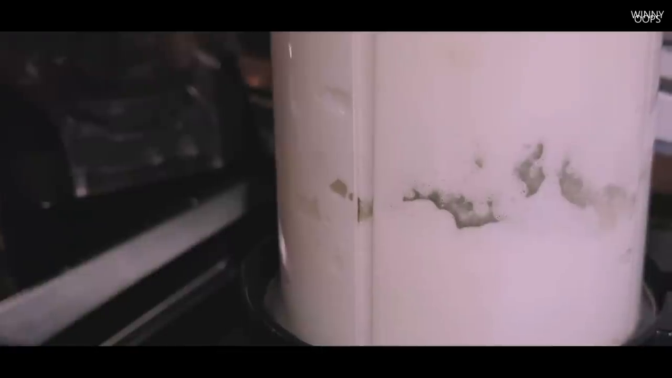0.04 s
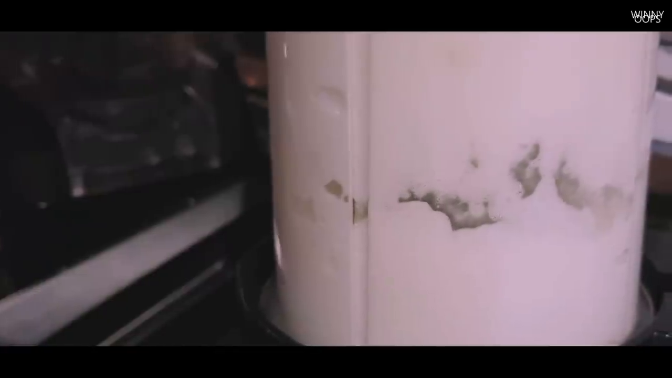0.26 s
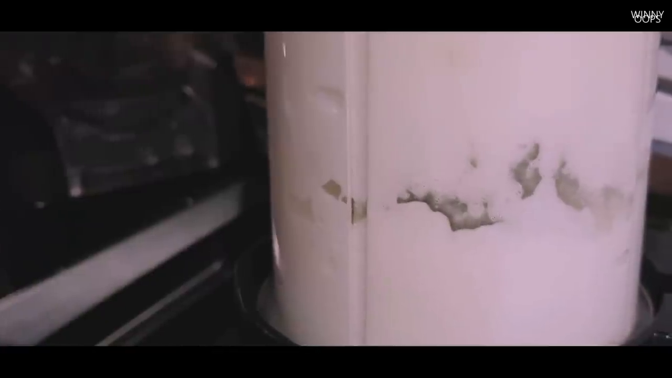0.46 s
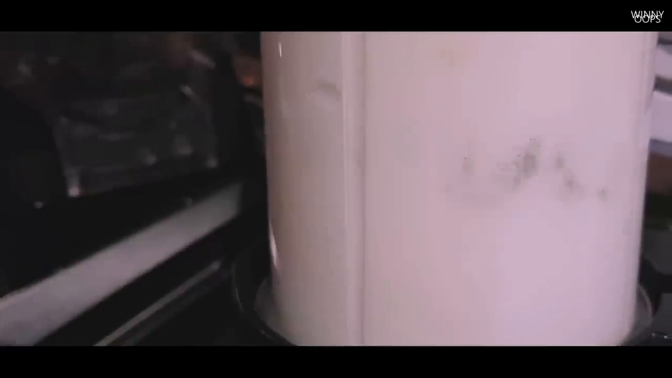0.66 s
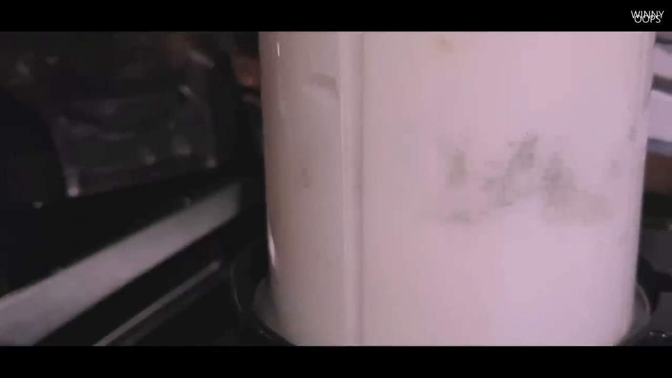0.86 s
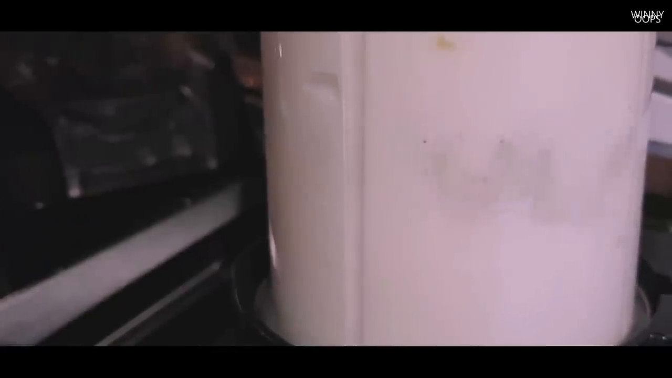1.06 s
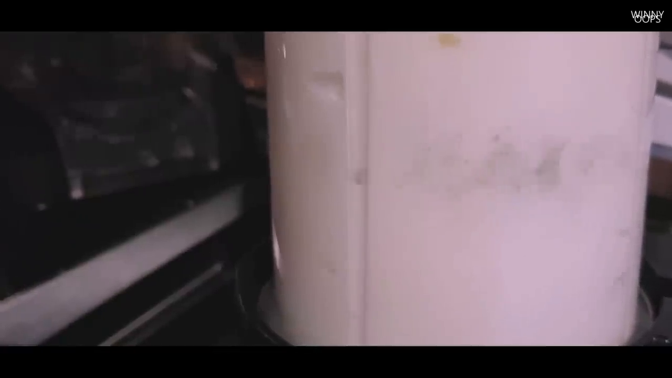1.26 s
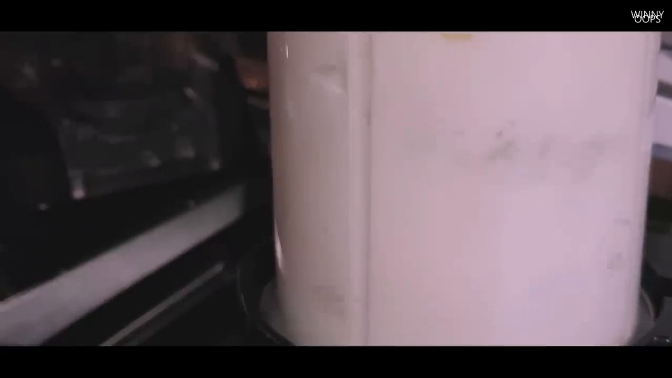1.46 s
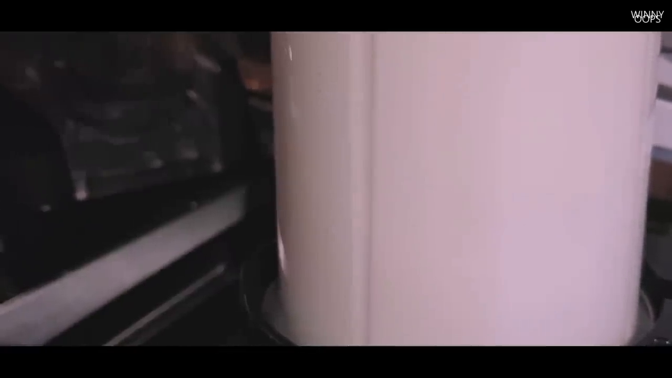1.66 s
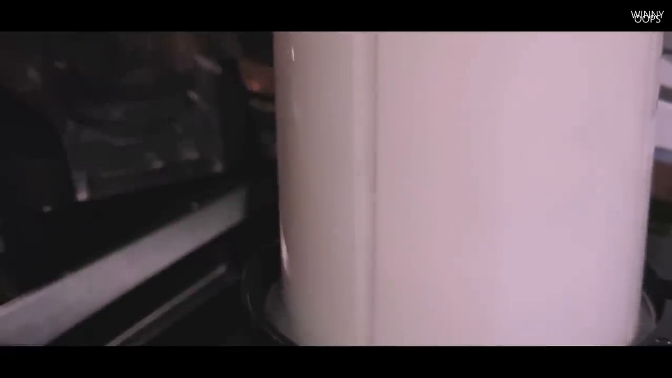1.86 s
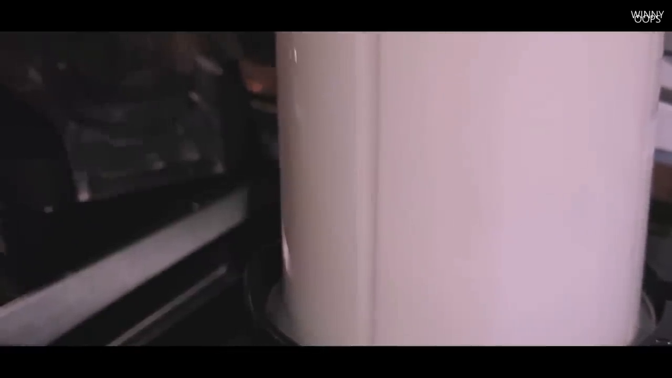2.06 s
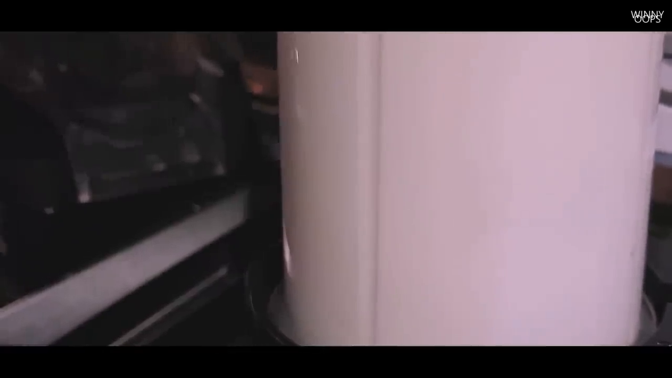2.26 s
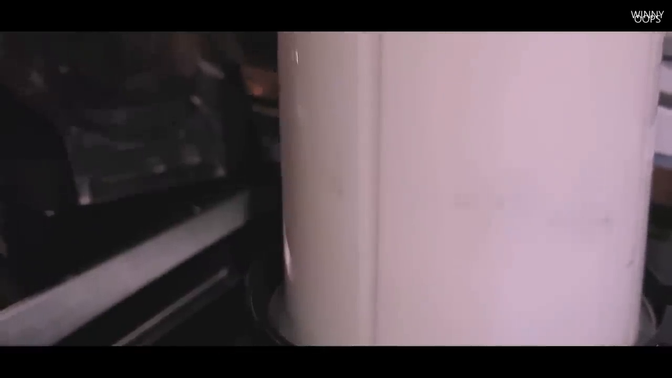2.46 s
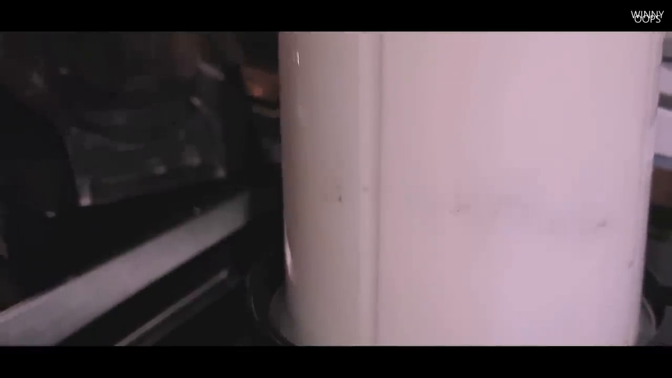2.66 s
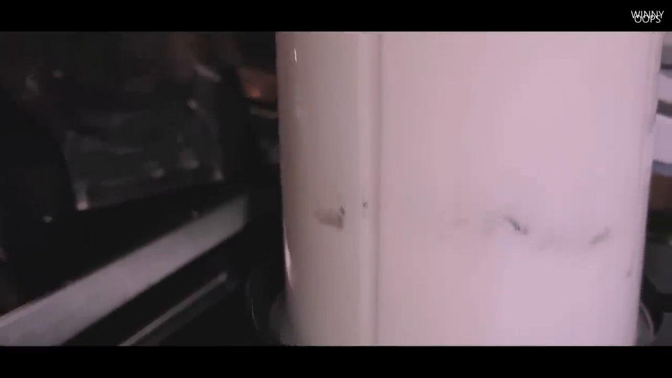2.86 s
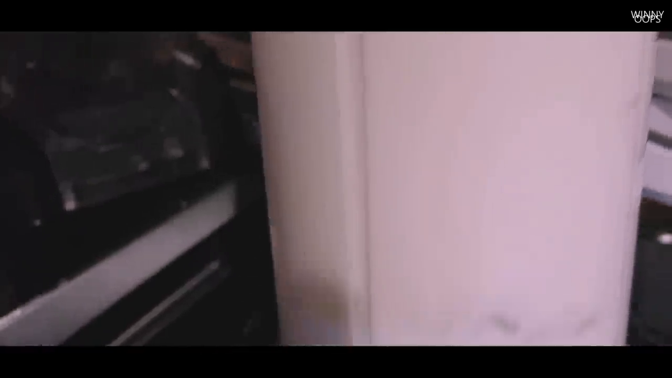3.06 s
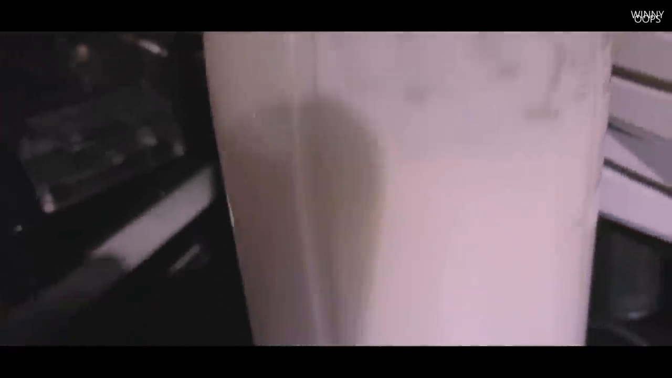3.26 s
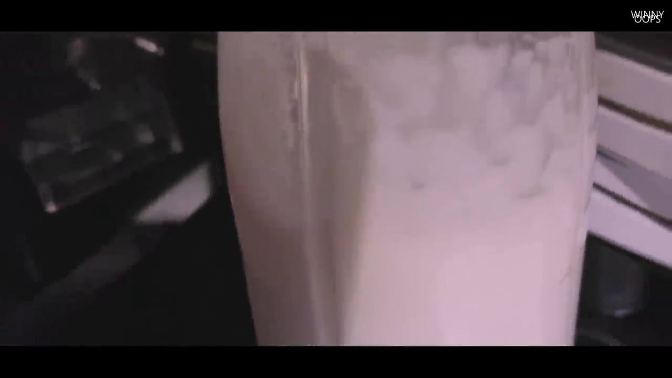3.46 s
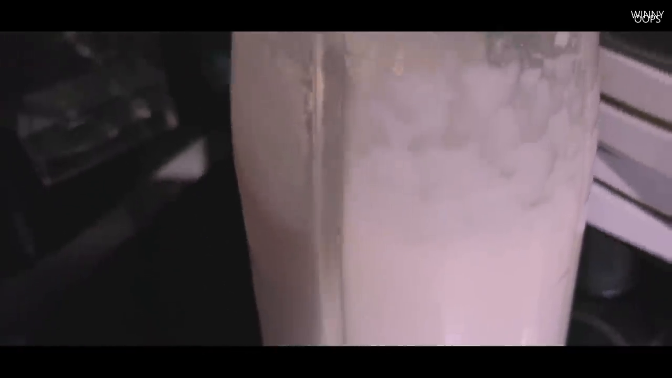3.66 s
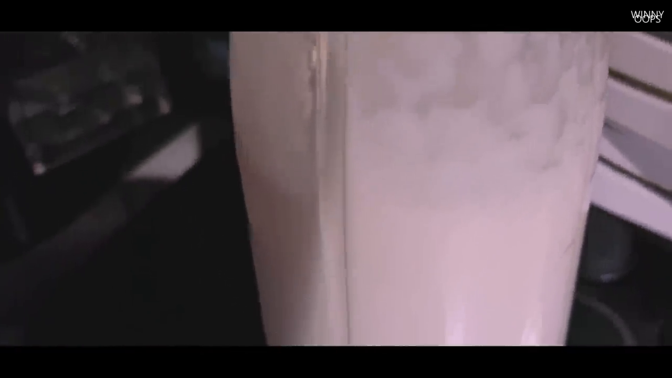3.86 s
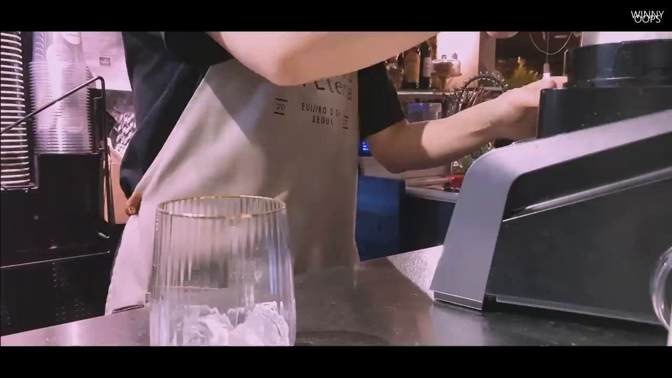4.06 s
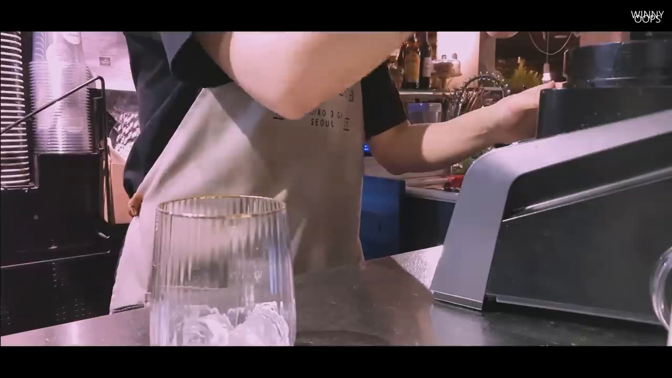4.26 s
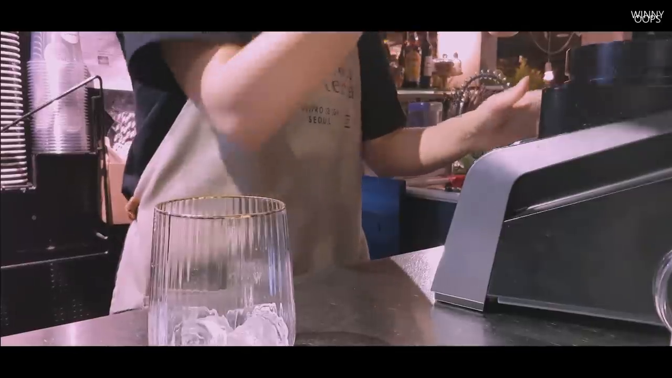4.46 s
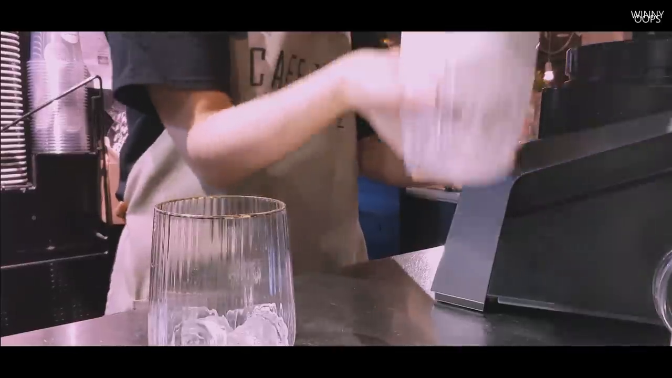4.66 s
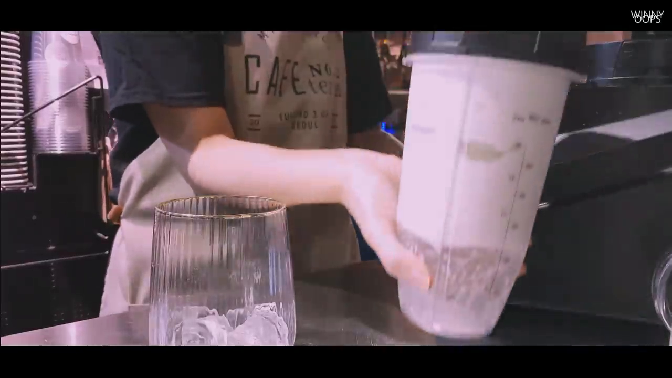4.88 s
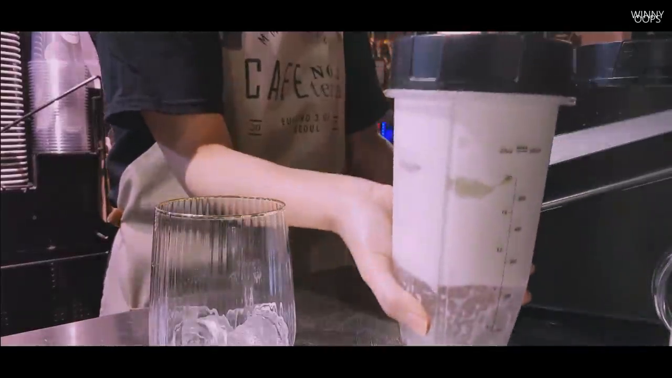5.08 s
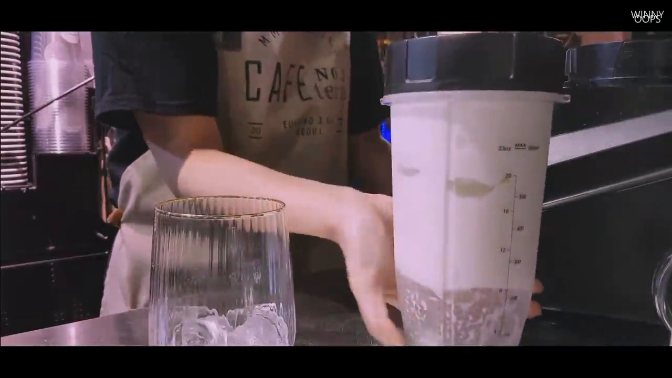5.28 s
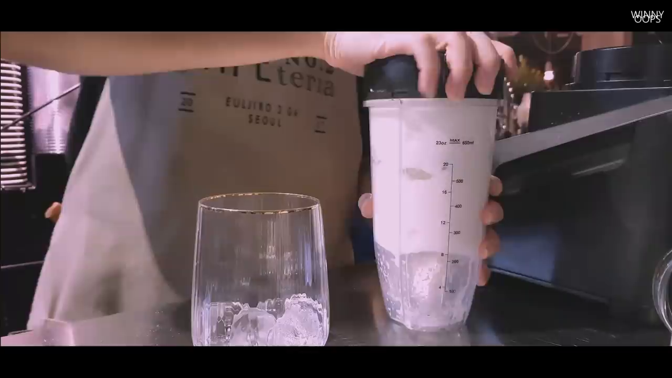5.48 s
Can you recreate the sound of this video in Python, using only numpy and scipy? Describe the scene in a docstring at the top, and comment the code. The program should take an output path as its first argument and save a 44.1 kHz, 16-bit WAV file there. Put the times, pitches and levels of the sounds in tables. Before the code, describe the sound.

A blender runs briefly, crunching ice in milk, then winds down before its plastic jar is thumped onto a counter.

```python
"""A cafe blender on milk and ice.

The blades of one burst tick to rest against the ice; the motor then spins up, bogs down twice on ice
chunks, is switched off and coasts while the slush swirls on. Shaft speed sets the pitch of the hum and
the strength of the churning, and impacts excite the resonances of the plastic jar. The jar is knocked,
scrapes off its base and is set down, rocking, on the counter, over the hush of the cafe."""
import sys
import numpy as np
from scipy import signal
from scipy.fft import rfft, irfft, next_fast_len
from scipy.io import wavfile
from scipy.ndimage import uniform_filter1d

SR = 44100
rng = np.random.default_rng(int(sys.argv[2]) if len(sys.argv) > 2 else 0)


def dump_mix(stems):
    """Bounce the given channels to the path in sys.argv[1] as a 16-bit WAV at rate SR."""
    frames = np.atleast_2d(stems).T  # one column per channel
    limited = np.clip(frames, -1, 1)  # hard clip at full scale
    pcm = np.round(limited * 32767).astype(np.int16)
    wavfile.write(sys.argv[1], SR, pcm)


N = 243431
T = np.arange(N) / SR

# The shaft runs out, spins up, bogs down twice and coasts. Each row: time in seconds, turns per second.
SHAFT_SPEED = [(0, 20.5), (.38, 6.5), (.5, 1), (.55, 1), (.56, 30), (.66, 82), (.75, 107), (.9, 133.5),
               (1.03, 147), (1.18, 156.5), (1.5, 166), (1.65, 165.7), (1.7, 153), (1.76, 121), (1.8, 122),
               (1.9, 141), (2, 137.5), (2.08, 128), (2.18, 102.5), (2.31, 88), (2.9, 54), (3.5, 23),
               (4.05, 0)]
FULL_SPEED, DRONE_FROM_SPEED = 160, 62  # turns per second
ON_S = .558  # the motor is switched on
# The hum swells with speed. Each row: turns per second, level in dB.
HUM_BY_SPEED = [(50, -89), (59, -67.5), (82, -61), (115, -61.5), (126, -49), (137, -46.5), (167, -47)]
# Harmonics of the drone. Each row: multiple of the shaft rate, relative level in dB.
DRONE_ORDERS = [(3, 2), (4, 1.5), (5, 0.5), (6, 0.5), (7, -1)]
DRONE_DB, JOLT_DB = -62, -28.5
RASP_ORDER, WHINE_ORDER, WHINE_DB = 24, 26, -4

# Resonances. Each row: centre in Hz, width in Hz, lift in dB.
BASE_MODES = [(490, 25, 7), (580, 70, 16.5), (662, 40, 8.5), (830, 25, 5), (992, 55, 12)]  # the jar on its base
JAR_MODES = [(460, 58, 5.5), (589.2, 115, 17), (843, 48, 8), (1006, 73, 7.5), (1540, 260, 6),
             (2099, 250, 9), (3083, 420, 10), (3320, 110, 4.5), (3529, 190, 8.5), (5150, 180, 8.5)]  # the filled jar
WALL_MODES = [(1600, 130, 3), (2120, 130, 4)]  # the wall, freed as the slush sinks
GURGLE_MODES = [(200.8, 300, 9.5)]  # bubbles in the slowing slush
COUNTER_MODES = [(154.6, 43, 11.5), (304, 120, 7.5), (501, 53, 5.5), (676, 74, 11), (1080, 250, 8),
                 (1320, 150, 2.5), (2750, 420, 8), (4200, 290, 4)]  # jar and counter together

# Free vibrations. Each row: frequency in Hz, relative level in dB, seconds to decay by 60 dB.
JOLT_RING = [(484, -24, 0.052), (602, 7, 0.052), (830, -2, 0.061)]  # the jar, jolted at switch-on
TICK_BRIGHT_RING = [(2750, 0, 0.022), (3020, 2.5, 0.03), (3410, 6.5, 0.027), (3710, 8.5, 0.022)]  # ice nudged by a blade
TICK_LOW_RING = [(1746, 0, 0.016), (1900, -6, 0.012)]

# Broad spectra of the sources. Each row: frequency in Hz, spectral density in dB.
SLOSH_SPECTRUM = [(30, -34.5), (70, -28), (140, -4), (300, 6.5), (700, 6.5), (1200, 5), (2500, -9.5),
                  (4000, -19.5), (7000, -20), (16000, -40)]
SPRAY_SPECTRUM = [(30, -45.5), (800, -7.5), (2500, -2), (3400, 0), (4100, 2), (6000, 0.5), (7200, -4.5),
                  (11000, -9), (12000, -22.5), (16000, -25)]
ICE_SPECTRUM = [(30, -35), (140, -25.5), (600, -27), (1200, -17.5), (1900, -8), (2450, -8.5), (2950, -3),
                (3550, -2.5), (3900, -5.5), (4500, -14.5), (7000, -21.5), (16000, -31)]
THUD_SPECTRUM = [(25, -50), (70, -14), (135, -5.5), (280, -0.5), (500, -5), (900, -20), (1800, -33),
                 (4000, -46), (16000, -66)]
CLICK_SPECTRUM = [(30, -39), (400, -5.5), (1400, -4), (3000, -16), (5000, -18), (7000, -27), (16000, -22)]
SHARP_CLICK_SPECTRUM = [(30, -35.5), (1000, -5), (6500, 1), (16000, -13)]
RUB_SPECTRUM = [(30, -20), (120, -22), (290, 2.5), (480, -3), (1200, -10), (1800, -18), (3200, -18),
                (4500, -20), (7000, -27), (16000, -43)]
SKIN_SPECTRUM = [(30, -27), (2000, -17.5), (3700, -3.5), (4300, 3), (4800, -7), (16000, -29)]
CAFE_SPECTRUM = [(30, -22.5), (200, -12.5), (380, -3), (620, -7.5), (1000, -13.5), (1700, -21.5),
                 (2300, -23), (4500, -17.5), (7000, -19), (7900, -27.5), (10000, -27.5), (11300, -32.5),
                 (15500, -42.5)]

# The blades heave the still liquid, then grip it until the big bite. Each row: start, end and
# fade time in seconds, then the lifts of slosh, spray and hum in dB.
SURGES = [(.558, 0.94, 0.39, 13, 4, -1), (0.559, 1.8, 0.11, 7.5, 3, 8.5)]
# Churning at full speed, and its loss for each halving of the swirl.
SLOSH_DB, SLOSH_DB_PER_HALVING = -43, 4
SPRAY_DB, SPRAY_DB_PER_HALVING = -34.5, 6.5
UNBLENDED_SHARE = 0.68  # the swirl's share of the shaft speed while the ice is whole
CARRIED_SWIRL = 4.2  # turns per second that the blended liquid keeps by inertia
STILL_S, SETTLE_S = 4.1, 0.016  # the swirl stops abruptly at the knock, as the hush steps up
GURGLE_DB, BUBBLE_DB, LUMP_DB = -4.5, -6.5, -13
BUBBLES_PER_S, BUBBLE_HZ, BUBBLE_SPREAD_OCTAVES, BUBBLE_CYCLES = 130, 511, .2, 68
# Large air pockets. Each row: start in seconds, starting pitch in Hz, peak in dB, length in seconds,
# glide in Hz per second.
GULPS = [(0.02, 488, -54.5, 0.096, -400), (0.284, 495, -51, 0.038, -900), (3.245, 550, -46, 0.023, 1200),
         (3.57, 520, -45.5, 0.036, -1200), (4.015, 520, -56.5, 0.043, -1500)]

# The blades bite into ice. Each row: start in seconds, end in seconds, level of the crunch in dB.
BITES = [(0.626, 0.62, -37), (0.703, 0.704, -30.5), (.92, 1.008, -36.5), (1.633, 1.675, -23),
         (1.672, 1.721, -20.5), (1.728, 1.774, -23), (1.921, 1.94, -29), (1.941, 2.03, -26),
         (2.058, 2.119, -27.5), (2.152, 2.167, -25), (2.19, 2.219, -33), (2.273, 2.292, -36.5)]
BITE_RISE_DB_PER_S, BITE_FALL_DB_PER_S = 330.5, 402.5
# Single chunks smashed by a blade. Each row: time in seconds, peak in dB.
CHUNKS = [(0.607, -22.5), (0.6404, -17), (0.6574, -22), (1.6242, -19.5), (1.6745, -12), (1.6865, -8.5),
          (1.6915, -8), (1.7015, -14), (1.7098, -10), (1.7645, -5.5), (1.7702, -13.5), (1.8223, -21),
          (1.9, -23), (1.9155, -14), (1.9914, -11), (2.0028, -16), (2.0602, -18), (2.0822, -10.5),
          (2.1016, -11), (2.14, -15), (2.1595, -16), (2.2752, -28), (2.4446, -39), (2.907, -39),
          (3.1262, -31), (3.2534, -34), (3.3505, -39)]
# Slow blades nudge the ice. Each row: time in seconds, peaks of the bright and the low ring in dB.
TICKS = [(0.004, -47, -45), (0.03, -40, -48), (0.0564, -45.5, -49), (0.0846, -39.5, -47),
         (0.1147, -48, -48), (0.1463, -45.5, -51), (0.2647, -47.5, -59), (0.3159, -43, -60),
         (0.3825, -51.5, -69), (3.5164, -39, -45.5), (3.639, -45, -47)]
SKID_START_S, SKID_END_S, SKID_HZ, SKID_DB = .795, .835, 5230, -37

# The jar knocks on base and counter, then rocks. Each row: time in seconds, thud in dB, click in dB.
KNOCKS = [(4.0947, -37, -44.5), (4.0984, -37.5, -38.5), (4.2265, -52, -44), (5.106, -44, -34),
          (5.1089, -18, -26.5), (5.117, -28, -29), (5.125, -23.5, -38), (5.1739, -21.5, -23.5),
          (5.2003, -28, -32), (5.2227, -29.5, -35), (5.2605, -33.5, -36.5), (5.33, -41, -54.5),
          (5.367, -46.5, -62)]
# Two sharp, bright clicks: one as the hush steps up, one ending the scrape.
# Each row: time in seconds, peak in dB.
SHARP_CLICKS = [(4.0944, -46), (4.271, -37.5)]
# The jar slides off the base. Each row: start in seconds, end in seconds, level in dB.
SLIDES = [(4.095, 4.16, -60.5), (4.206, 4.22, -55), (4.226, 4.262, -48), (4.29, 4.55, -70.5)]
SLIDE_RISE_DB_PER_S, SLIDE_FALL_DB_PER_S = 1000, 502
# The wet jar squeaks as it is turned. Each row: start and end in seconds, pitch in Hz, levels of the
# fundamental and the octave in dB.
SQUEAKS = [(4.37, 4.59, 1700, -73, -84), (5.38, 5.487, 820, -67, -69)]
BRUSH_S, BRUSH_DB = 5.043, -61

HUSH_STEP_S, HUSH_BEFORE_DB, HUSH_AFTER_DB = 4.095, -73, -66.5
VOICE_BAND_HZ, CUTOFF_HZ = 7300, 15700


def motor(speed, turns):
    """Forced vibration: two blades hum, and shaft harmonics swell as they cross the jar's resonances."""
    phase = 2 * np.pi * (turns + 0.004 * drift(17) + 0.004 * drift(70))
    orders = sum(from_db(db + lift_db(BASE_MODES, k * speed) + 0.98 * drift(8.4)) * np.sin(k * phase)
                 for k, db in DRONE_ORDERS)
    drive = np.clip((speed - DRONE_FROM_SPEED) / (FULL_SPEED - DRONE_FROM_SPEED), 0, 1)
    drone = from_db(DRONE_DB + surge_db("hum")) * np.sqrt(drive) * orders
    blades = from_db(2 * drift(25)) * np.sin(2 * phase)
    # The brushes on the commutator give a rough band and a thin whine that climb with speed.
    rasp = from_db(-1) * drift(200) * np.sin(RASP_ORDER * phase)
    whine_gain = from_db(WHINE_DB + 2 * drift(40)) * (speed / FULL_SPEED) ** 3
    whine = whine_gain * np.sin(2 * np.pi * (WHINE_ORDER * turns + .09 * drift(14)))
    hum_gain = from_db(np.interp(speed, *np.transpose(HUM_BY_SPEED), left=-140) + surge_db("hum"))
    hum = hum_gain * (blades + (rasp + whine) * speed / FULL_SPEED)
    out = np.sqrt(2) * (hum + drone)
    add(out, ON_S, from_db(JOLT_DB) * ring(JOLT_RING, swell_s=0.0048))
    return out


def shaft_speed():
    """Rotor inertia rounds off each change of speed; in turns per second."""
    return uniform_filter1d(np.interp(T, *np.transpose(SHAFT_SPEED)), size=SR // 60)


def slush(speed, turns, bite):
    """Shot noise: splashes and grit excite the jar, pulsing once a turn; slow slush gurgles instead."""
    slosh_gain, spray_gain = churning(speed, bite)
    fast = np.clip(speed / 150, 0, 1)
    slow = np.sqrt(1 - fast ** 2)  # equal-power crossfade
    pulsing = from_db(0.76 * np.sin(2 * np.pi * turns) + .7 * drift(38))
    gurgle_modes = damped(JAR_MODES, 0.65) + GURGLE_MODES + WALL_MODES
    gurgle = rms_one(body(grains(2000, spread_db=2.5), SLOSH_SPECTRUM, gurgle_modes))
    coated_jar = damped(JAR_MODES, 0.89)  # slush flung up the wall damps its ring
    splash = rms_one(body(grains(16000, spread_db=0.5), SLOSH_SPECTRUM, coated_jar))
    grit = rms_one(body(grains(22000, spread_db=0.5), SPRAY_SPECTRUM, coated_jar))
    swirl = body(grains(3500, spread_db=2), SPRAY_SPECTRUM, JAR_MODES + WALL_MODES)
    swirl = rms_one(signal.sosfilt(signal.butter(2, 5200, fs=SR, output="sos"), swirl))
    # The last lumps of ice rattle round the wall, and the collapsing vortex laps unevenly.
    lumps = from_db(LUMP_DB) * rms_one(body(grains(45, spread_db=1.5), ICE_SPECTRUM, JAR_MODES))
    lapping = from_db(1.2 * drift(9))
    bubbling = from_db(GURGLE_DB) * gurgle + from_db(BUBBLE_DB) * bubbles()
    slosh = fast * splash + slow * lapping * bubbling
    spray = fast * grit + slow * (from_db(-3.5) * np.sqrt(lapping) * swirl + lumps)
    return pulsing * (slosh_gain * slosh + spray_gain * spray)


def churning(speed, bite):
    """The gains of slosh and spray follow power laws of the liquid's rate of swirl."""
    settling = np.clip((STILL_S - T) / SETTLE_S, 0, 1)
    swirl = np.where(T < ON_S, UNBLENDED_SHARE * speed, (speed + CARRIED_SWIRL) * settling)
    halvings = np.log2(FULL_SPEED / np.maximum(swirl, .1))
    slosh = from_db(SLOSH_DB - SLOSH_DB_PER_HALVING * halvings + surge_db("slosh"))
    spray = from_db(SPRAY_DB - SPRAY_DB_PER_HALVING * halvings + surge_db("spray"))
    heave = from_db(-11) * bite  # a bite also heaves the slush
    return np.hypot(slosh, heave), spray


def surge_db(layer, rise_s=0.03):
    """Fluid loading: a layer is louder while the blades grip the liquid."""
    column = ("slosh", "spray", "hum").index(layer)
    return sum(lifts[column] * np.clip(np.minimum((T - start) / rise_s, (end - T) / fade), 0, 1)
               for start, end, fade, *lifts in SURGES)


def ice(bite):
    """Fracture and impact: a hail of fragments, a skid on the wall, hard chunks and ringing ticks."""
    hail = grains(700, spread_db=1.5) + grains(4000, spread_db=4)
    out = bite * rms_one(body(hail, ICE_SPECTRUM, JAR_MODES))
    skid = body(rng.standard_normal(N), SPRAY_SPECTRUM, [(SKID_HZ, 120, 16)])
    skid = signal.sosfilt(signal.butter(4, SKID_HZ, "high", fs=SR, output="sos"), skid)
    skidding = held(SKID_START_S, SKID_END_S, BITE_RISE_DB_PER_S / 2, BITE_FALL_DB_PER_S)
    out += from_db(SKID_DB) * skidding * rms_one(skid)
    for s, db in CHUNKS:
        modes = JAR_MODES + [(rng.uniform(2900, 3700), 130, 6)]  # each chunk has a pitch of its own
        smash = impact(ICE_SPECTRUM, modes, crack_t60=.008, tail_db=-1.5, tail_t60=0.072)
        add(out, s, from_db(db) * smash)
    for s, bright_db, low_db in TICKS:
        add(out, s, from_db(bright_db) * ring(TICK_BRIGHT_RING, swell_s=0.00054))
        add(out, s, from_db(low_db) * ring(TICK_LOW_RING, swell_s=0.0024))
    return out


def biting():
    """Envelope of the crushing: each bite builds and clears exponentially; the strongest prevails."""
    bites = [from_db(db) * held(start, end, BITE_RISE_DB_PER_S, BITE_FALL_DB_PER_S)
             for start, end, db in BITES]
    return np.max(bites, axis=0) * (T > ON_S)


def handling():
    """The jar thuds, its rim clicks and tiny slips ring it, by impact and friction; two sharp, bright clicks
    also sound."""
    sliding = sum(from_db(db) * held(start, end, SLIDE_RISE_DB_PER_S, SLIDE_FALL_DB_PER_S)
                  for start, end, db in SLIDES)
    brushing = from_db(BRUSH_DB) * held(BRUSH_S, BRUSH_S, rise_db_per_s=2300, fall_db_per_s=130)
    out = sliding * rms_one(body(grains(2500, spread_db=1.5), RUB_SPECTRUM, damped(JAR_MODES, 0.5)))
    out += brushing * rms_one(body(rng.standard_normal(N), SKIN_SPECTRUM))
    for s, thud_db, click_db in KNOCKS:
        thud = impact(THUD_SPECTRUM, COUNTER_MODES, crack_t60=0.028, tail_db=-10, tail_t60=0.15)
        click = impact(CLICK_SPECTRUM, COUNTER_MODES, crack_t60=0.029, tail_db=4.5, tail_t60=0.051)
        add(out, s, from_db(thud_db) * thud + from_db(click_db) * click)
    for s, db in SHARP_CLICKS:
        click = impact(SHARP_CLICK_SPECTRUM, COUNTER_MODES, crack_t60=0.015, tail_db=3, tail_t60=0.035)
        add(out, s, from_db(db) * click)
    return out


def bubbles():
    """Small air pockets are damped oscillators, each with a pitch set by its size; unit rms."""
    out, t = np.zeros(N), T[:SR // 8]
    for when, size, strength, glide in rng.standard_normal((round(BUBBLES_PER_S * N / SR), 4)):
        start = (1000 * when) % (N / SR)  # spread evenly over the scene
        hz = BUBBLE_HZ * 2 ** (BUBBLE_SPREAD_OCTAVES * np.clip(size, -2, 2))
        envelope = (1 - np.exp(-t / .004)) * from_db(2 * strength - 60 * t * hz / BUBBLE_CYCLES)
        add(out, start, envelope * np.sin(2 * np.pi * hz * t * (1 + glide * t)))
    return rms_one(out)


def gulps():
    """Bubble resonance: large air pockets swell and ring for a moment, gliding in pitch."""
    out = np.zeros(N)
    for s, hz, db, length, glide in GULPS:
        t = T[:int(length * SR)]
        envelope = from_db(db) * np.sin(np.pi * t / length)
        add(out, s, envelope * np.sin(2 * np.pi * (hz + .5 * glide * t) * t))
    return out


def squeaks():
    """Stick-slip friction of the wet jar gives a wavering pitch and its octave."""
    out = np.zeros(N)
    for start, end, hz, db, octave_db in SQUEAKS:
        phase = 2 * np.pi * hz * (T + .00023 * drift(70))
        tone = from_db(db) * np.sin(phase) + from_db(octave_db) * np.sin(2 * phase)
        out += held(start, end, SLIDE_RISE_DB_PER_S, SLIDE_FALL_DB_PER_S) * tone
    return out


def room(x, wet_db, t60):
    """Reverberation: dense reflections from machines and walls follow the direct sound."""
    t = T[:SR // 2]
    echoes = rng.standard_normal(len(t)) * from_db(-60 * t / t60) * (t > .004)
    return x + from_db(wet_db) * signal.fftconvolve(x, echoes / np.linalg.norm(echoes))[:N]


def cafe_hush():
    """Ambient broadband noise, whose level steps up once."""
    gain = from_db(np.where(T < HUSH_STEP_S, HUSH_BEFORE_DB, HUSH_AFTER_DB))
    return gain * rms_one(body(rng.standard_normal(N), CAFE_SPECTRUM))


def impact(spectrum, modes, crack_t60, tail_db, tail_t60):
    """A contact force (impulse, short crunch and diffuse tail) excites a body; peak 1."""
    t = T[:SR // 3]
    crunch = rng.standard_normal(len(t)) * from_db(-60 * t / crack_t60)
    tail = rng.standard_normal(len(t)) * from_db(-60 * t / tail_t60)
    force = 0.46 * crunch / np.linalg.norm(crunch) + from_db(tail_db) * tail / np.linalg.norm(tail)
    force[0] -= 1
    sound = body(force, spectrum, modes)
    return sound / np.abs(sound).max()


def ring(modes, swell_s):
    """Free vibration: struck modes of random strength and phase swell briefly and decay; peak 1."""
    t = T[:SR // 4]
    sound = sum(from_db(db + rng.normal(0, 3) - 60 * t / t60)
                * np.sin(2 * np.pi * (hz * t + rng.random())) for hz, db, t60 in modes)
    sound *= 1 - np.exp(-(t / swell_s) ** 2)
    return sound / np.abs(sound).max()


def body(x, spectrum, modes=()):
    """A resonant body acts as a minimum-phase filter: a broad spectrum with peaks standing on it."""
    size = 2 * next_fast_len(len(x) // 2 + 4096)
    hz, points = np.arange(size // 2 + 1) * SR / size + 1, np.array(spectrum)
    db = np.interp(np.log(hz), np.log(points[:, 0]), points[:, 1])
    cepstrum = irfft(np.log(from_db(db + lift_db(modes, hz))))
    cepstrum[1:size // 2] *= 2  # folding the cepstrum makes the response causal
    cepstrum[size // 2 + 1:] = 0
    return irfft(rfft(x, size) * np.exp(rfft(cepstrum)))[:len(x)]


def lift_db(modes, hz):
    """Bell-shaped resonance curves, summed in dB at hz."""
    return sum(lift / (1 + (2 * (hz - centre) / width) ** 2) for centre, width, lift in modes)


def damped(modes, share):
    """Damping lowers each resonance to a share of its lift in dB."""
    return [(hz, width, share * lift) for hz, width, lift in modes]


def grains(per_s, spread_db):
    """Shot noise: tiny impacts at random moments, a few much larger than the rest."""
    sizes = from_db(spread_db * np.minimum(rng.exponential(1, N), 4)) * rng.choice([-1, 1], N)
    return rms_one(sizes * (rng.random(N) < per_s / SR))


def drift(hz):
    """Random fluctuation of unit rms: noise low-passed at hz."""
    step, run_in = 40, 2000
    pole = np.exp(-2 * np.pi * hz * step / SR)
    noise = rng.standard_normal(N // step + run_in + 2)
    slow = signal.lfilter([1], [1, -2 * pole, pole * pole], noise)[run_in:]
    return np.interp(np.arange(N) / step, np.arange(len(slow)), rms_one(slow))


def held(start, end, rise_db_per_s, fall_db_per_s):
    """Gain that grows exponentially up to start, holds at 1 until end and decays."""
    return from_db(-rise_db_per_s * np.maximum(start - T, 0) - fall_db_per_s * np.maximum(T - end, 0))


def add(out, s, sound):
    """Superpose a sound at s seconds."""
    start = max(round(s * SR), 0)
    out[start:start + len(sound)] += sound[:N - start]


def from_db(db):
    """Decibels to gain."""
    return 10 ** (np.asarray(db) / 20)


def rms_one(x):
    """Scale to unit rms."""
    return x / np.sqrt(np.mean(x ** 2) + 1e-20)


def scene():
    """Superposition: blender and jar close by, with little above the voice band, over the hush."""
    speed, bite = shaft_speed(), biting()
    turns = np.cumsum(speed) / SR
    jar = slush(speed, turns, bite) + ice(bite) + handling()
    near = motor(speed, turns) + gulps() + squeaks() + room(jar, wet_db=-12, t60=0.34)
    voice_band = signal.ellip(10, .5, 70, VOICE_BAND_HZ, fs=SR, output="sos")
    near = signal.sosfilt(voice_band, near) + from_db(-30) * near
    return (near + cafe_hush())[None]


def record(dry):
    """A steep low-pass filter removes the highest treble."""
    return signal.sosfilt(signal.ellip(10, .5, 70, CUTOFF_HZ, fs=SR, output="sos"), dry)


dry = scene()
out = record(dry)
dump_mix(out)
```